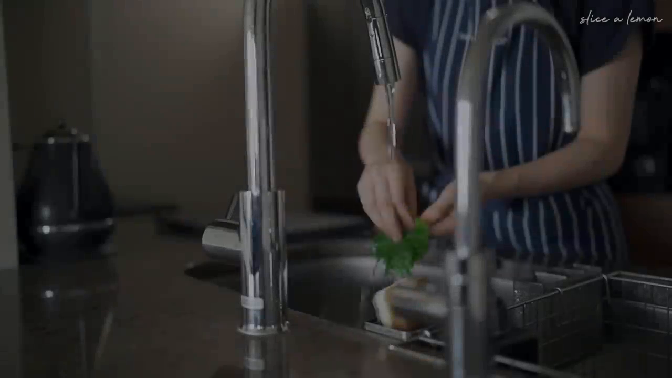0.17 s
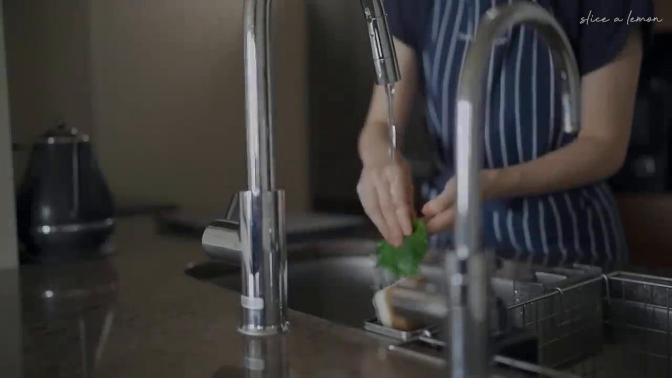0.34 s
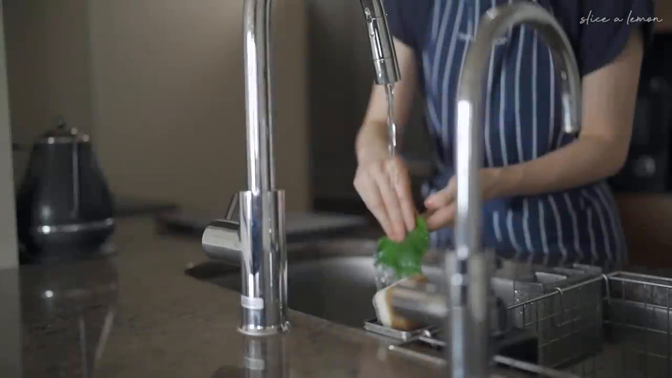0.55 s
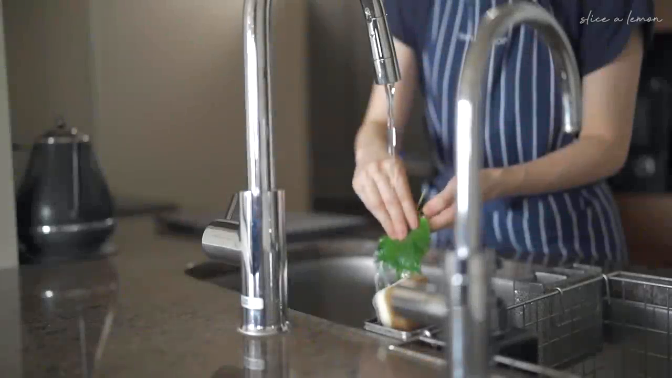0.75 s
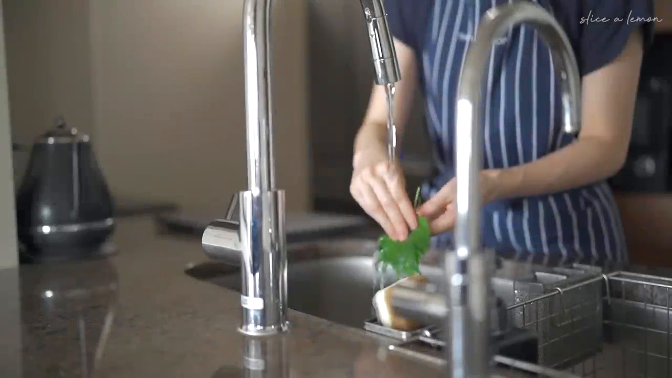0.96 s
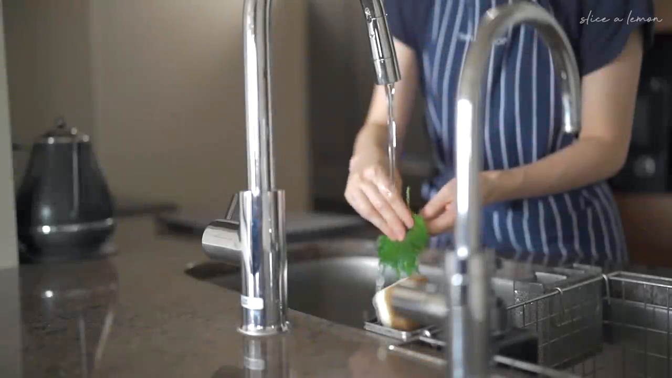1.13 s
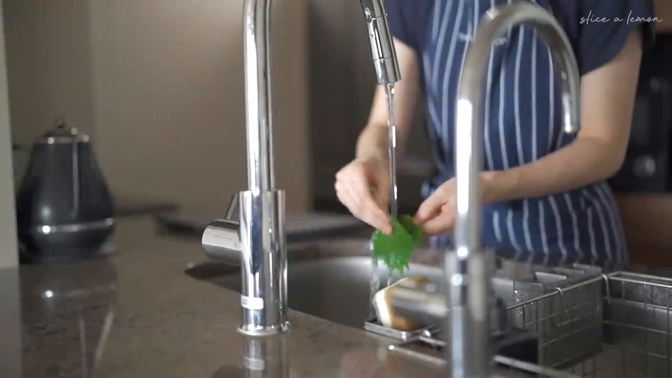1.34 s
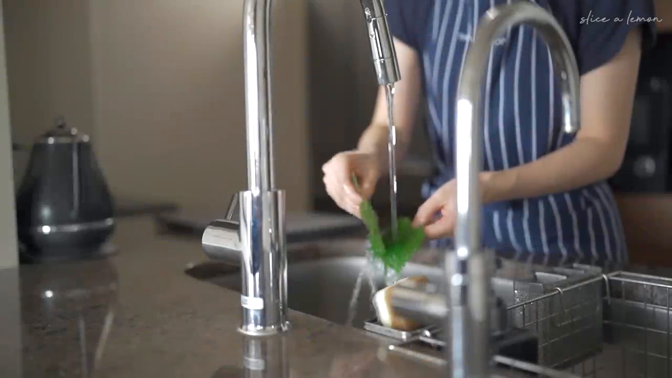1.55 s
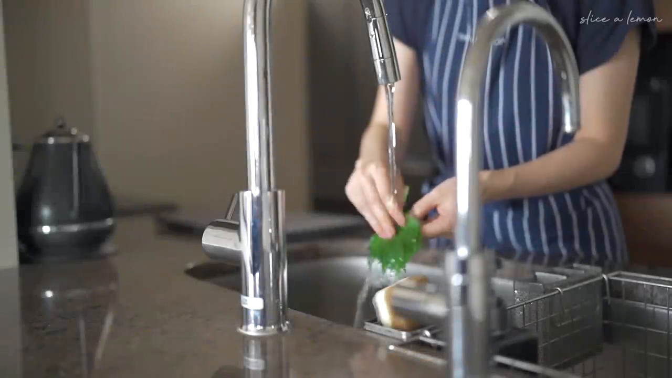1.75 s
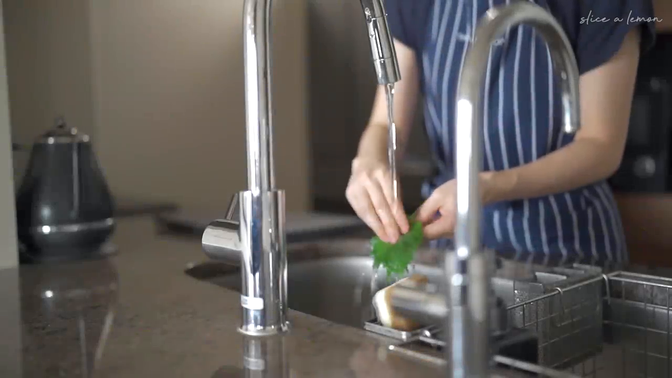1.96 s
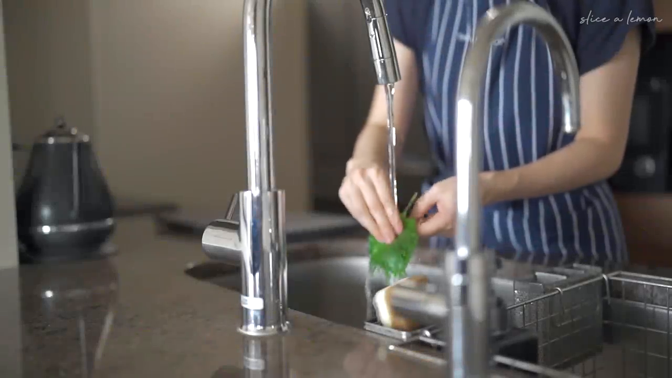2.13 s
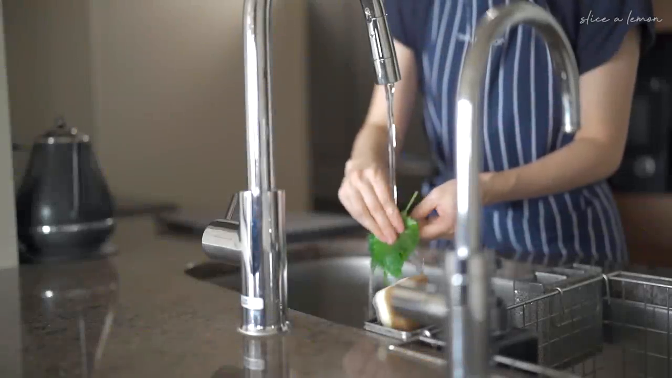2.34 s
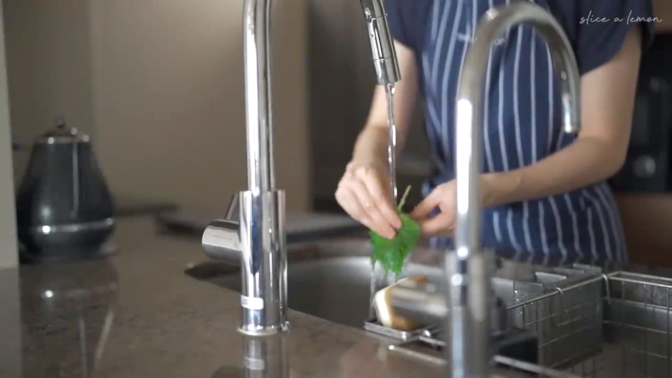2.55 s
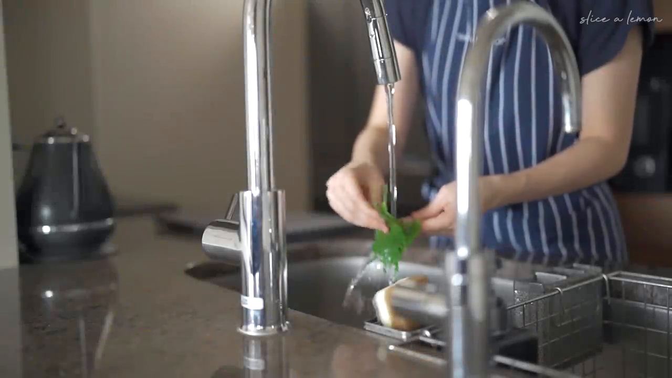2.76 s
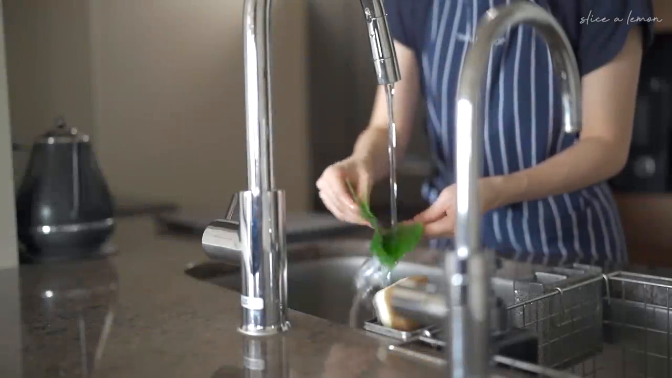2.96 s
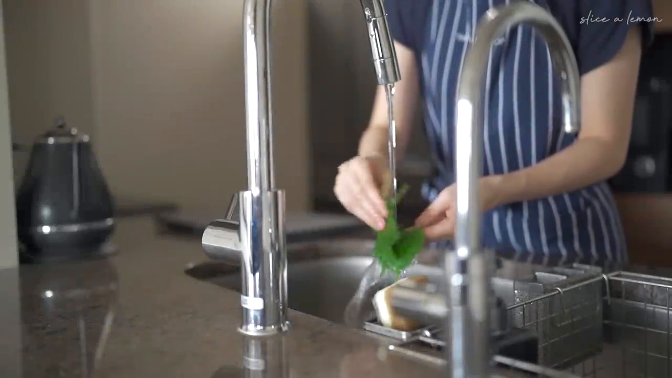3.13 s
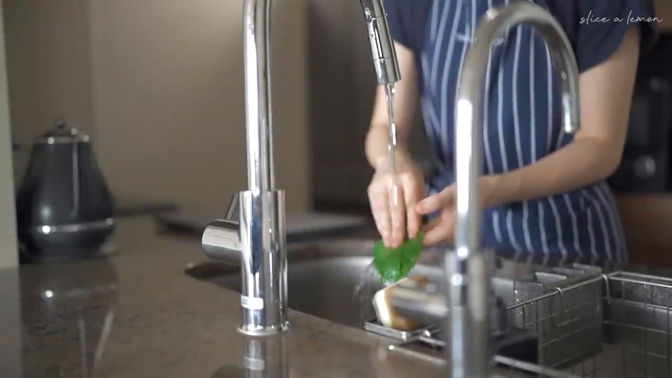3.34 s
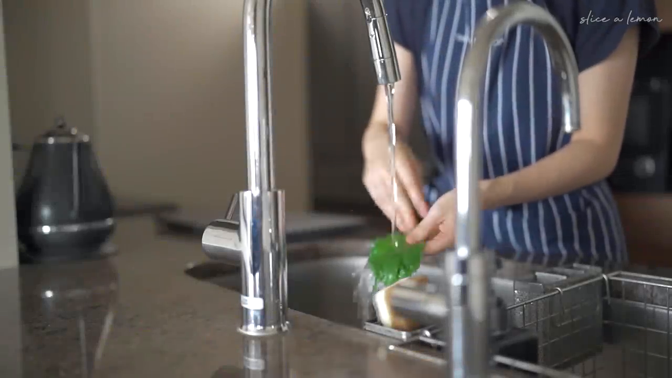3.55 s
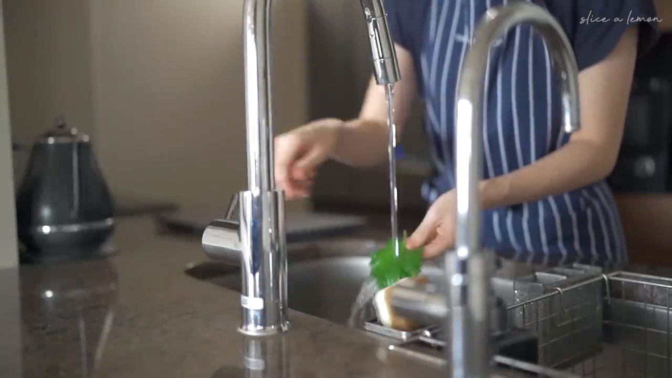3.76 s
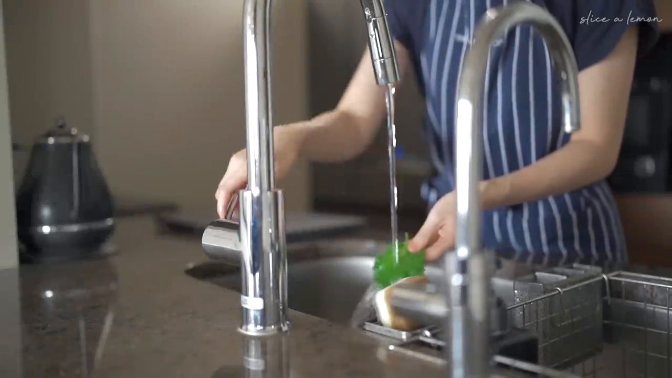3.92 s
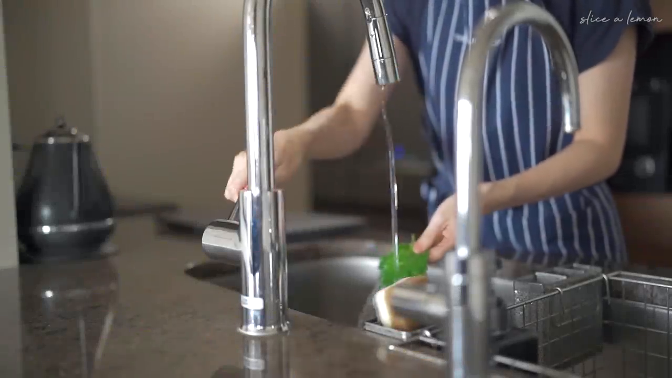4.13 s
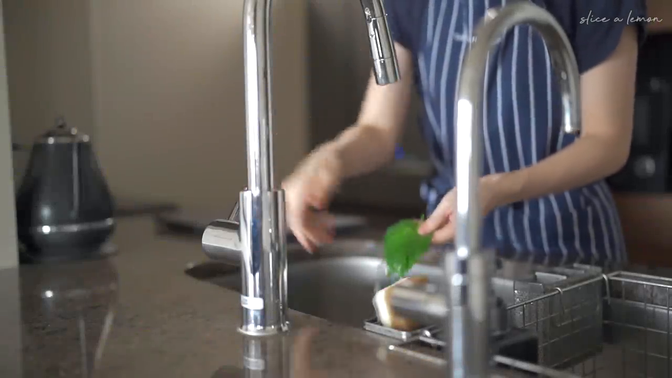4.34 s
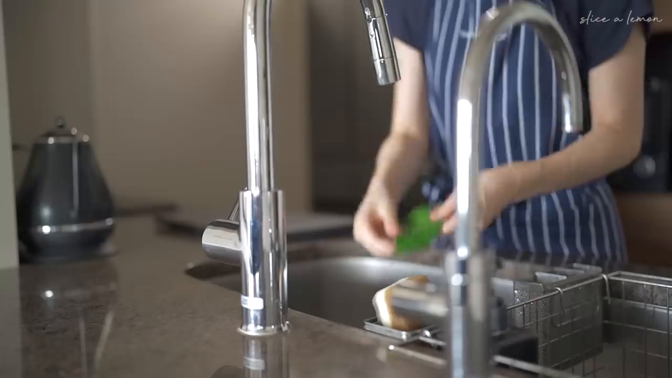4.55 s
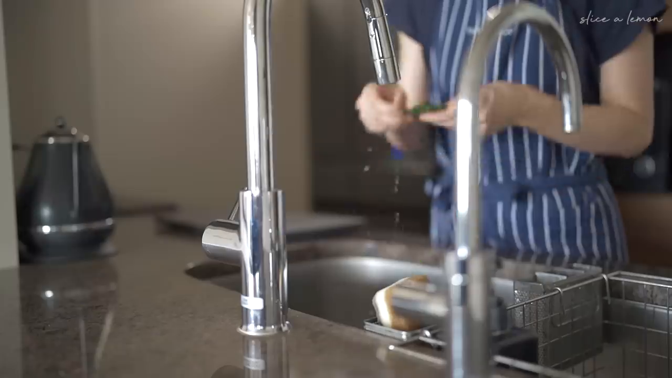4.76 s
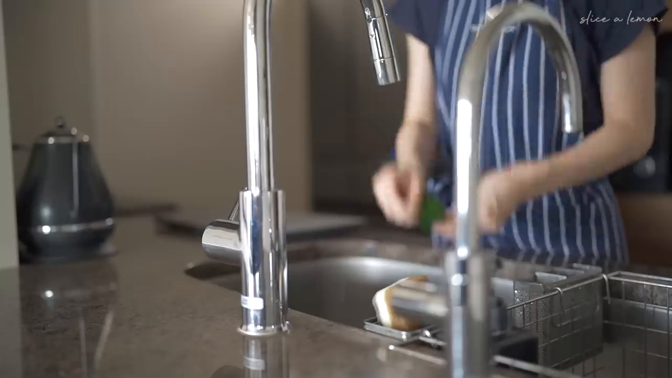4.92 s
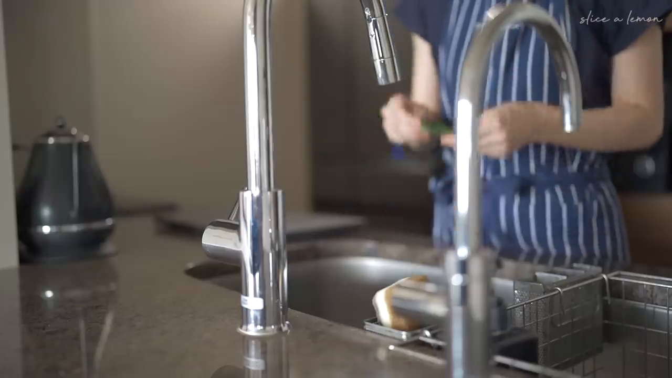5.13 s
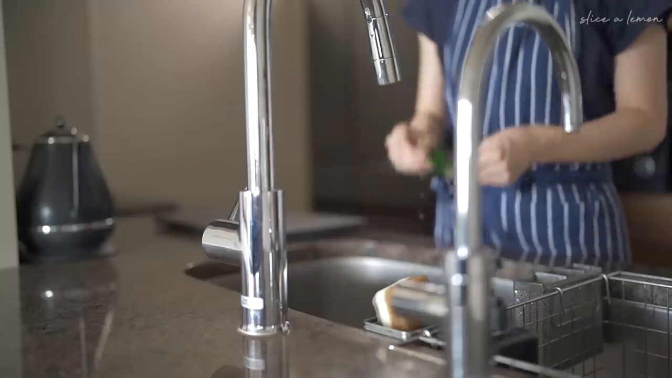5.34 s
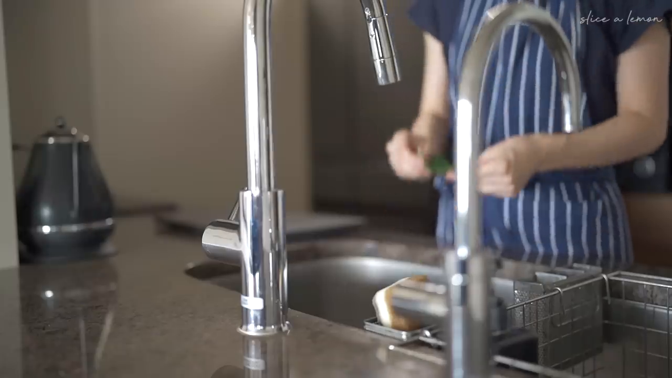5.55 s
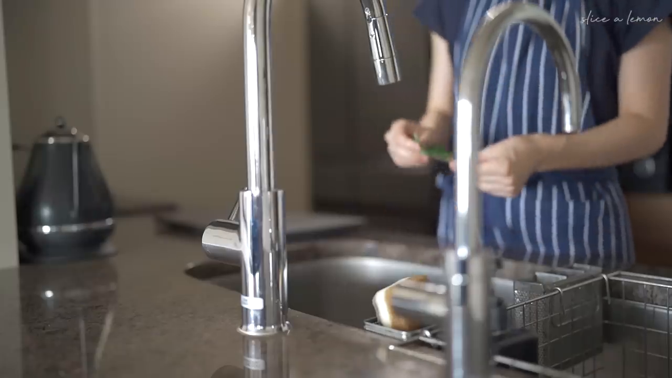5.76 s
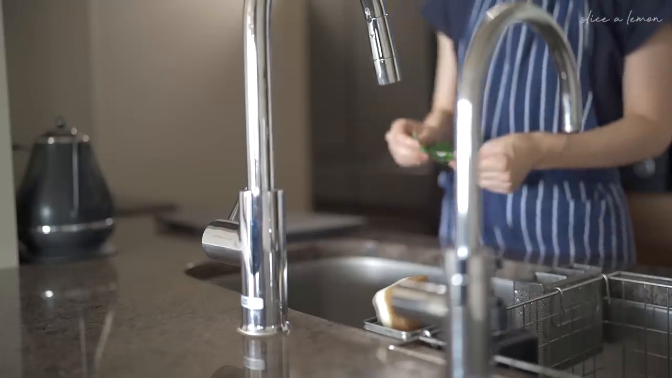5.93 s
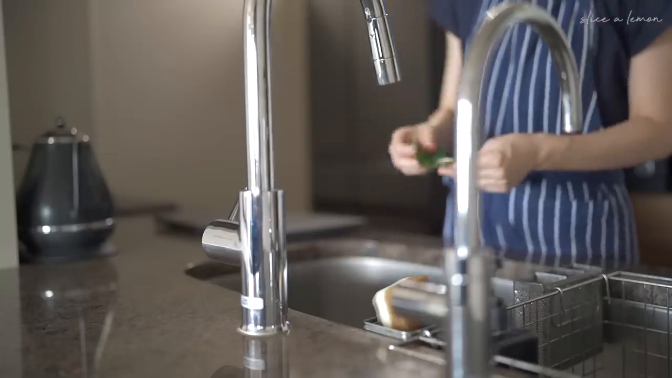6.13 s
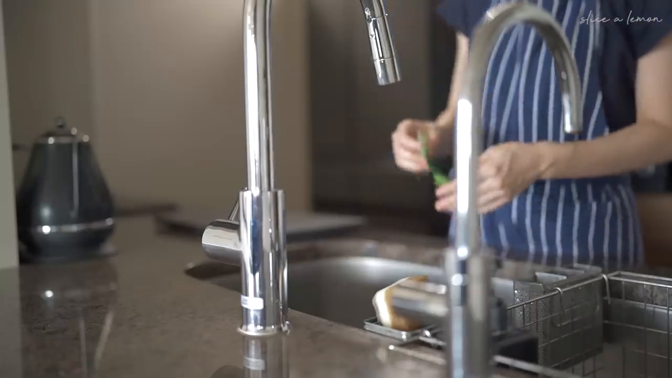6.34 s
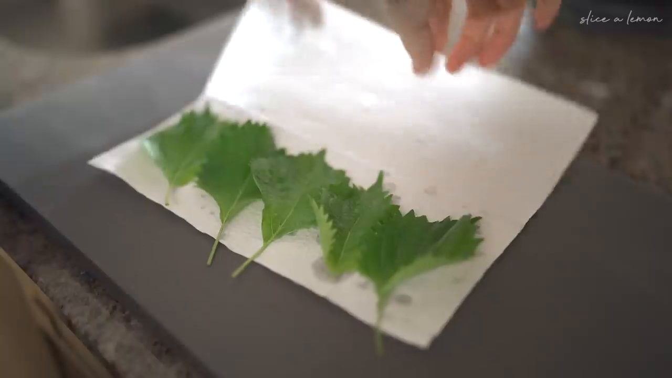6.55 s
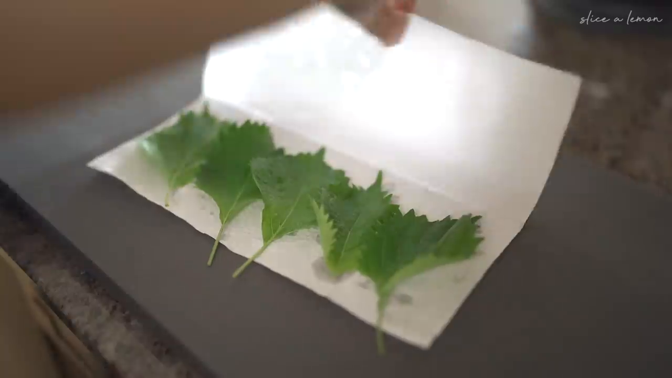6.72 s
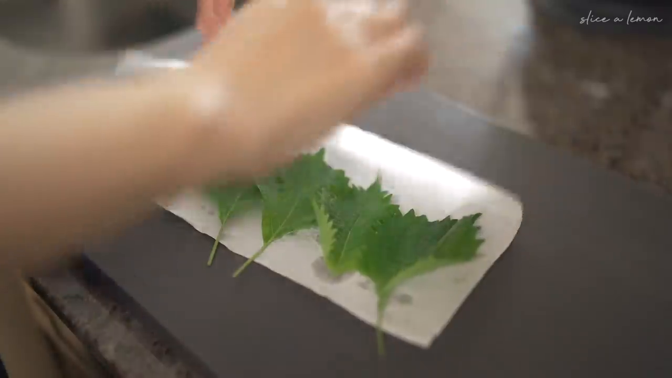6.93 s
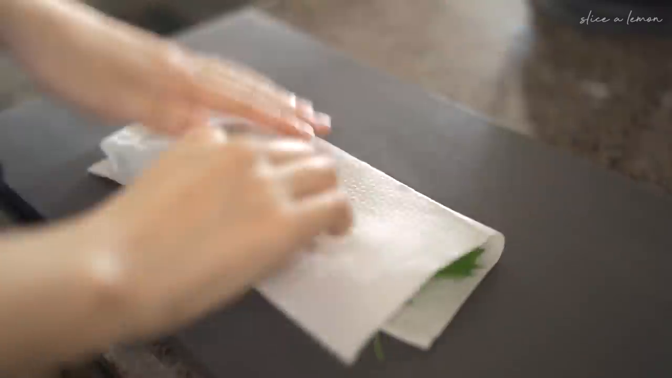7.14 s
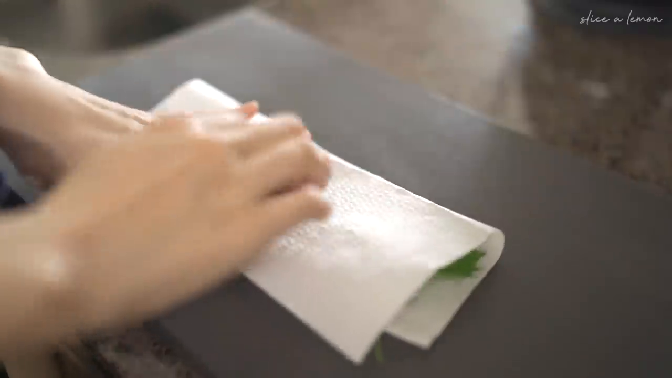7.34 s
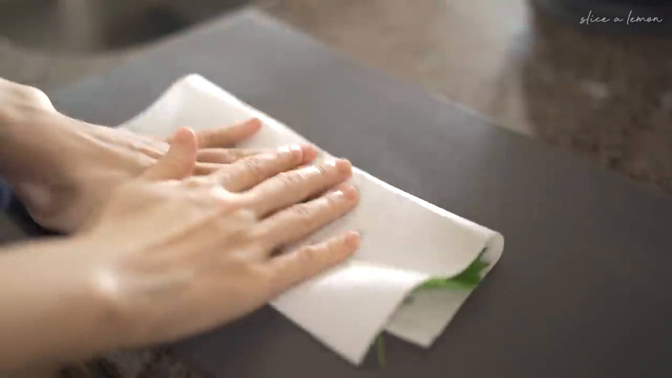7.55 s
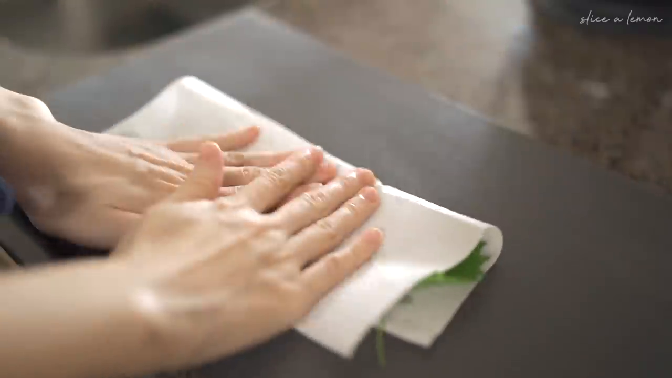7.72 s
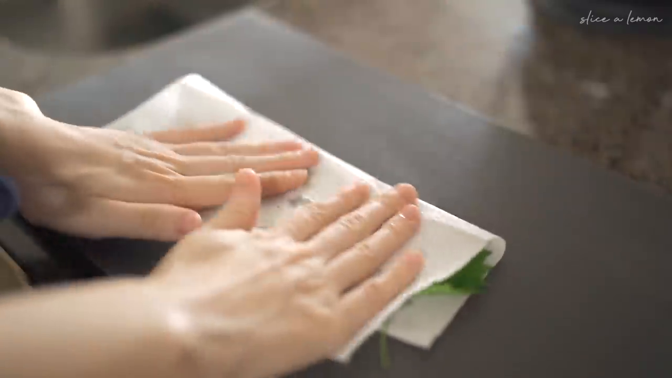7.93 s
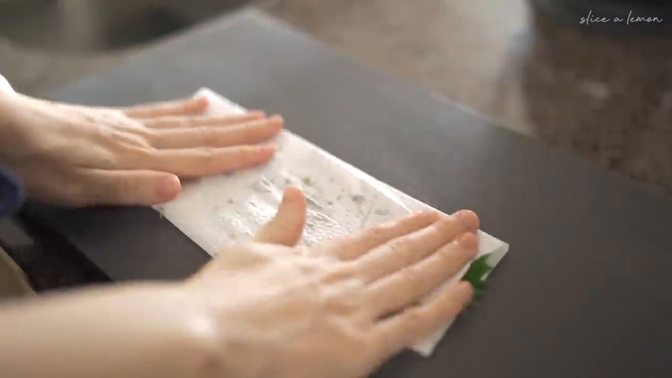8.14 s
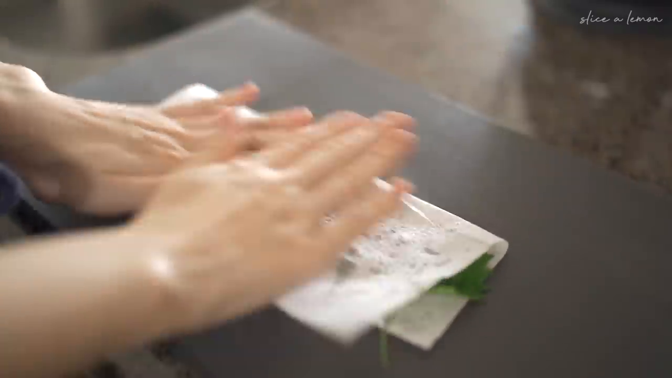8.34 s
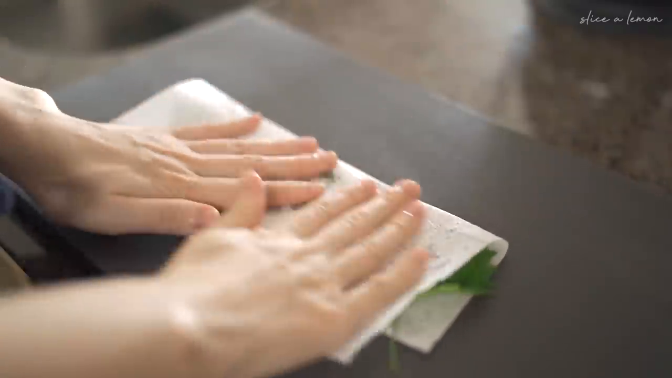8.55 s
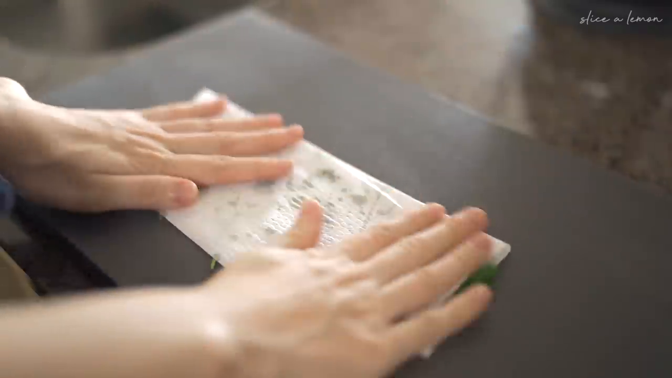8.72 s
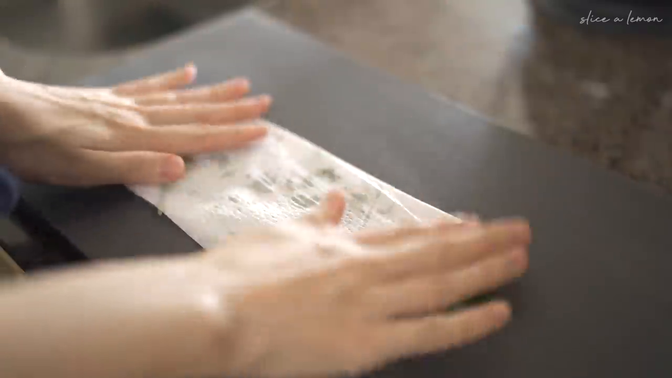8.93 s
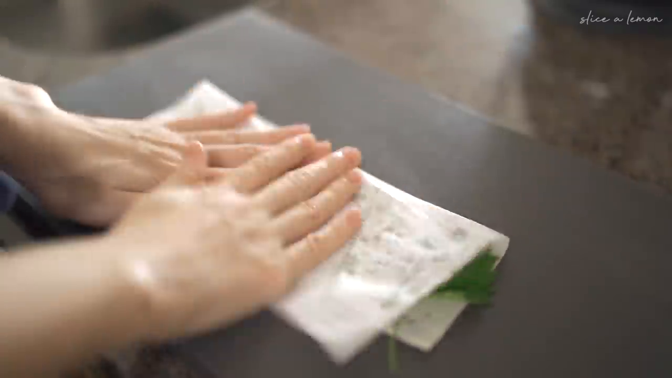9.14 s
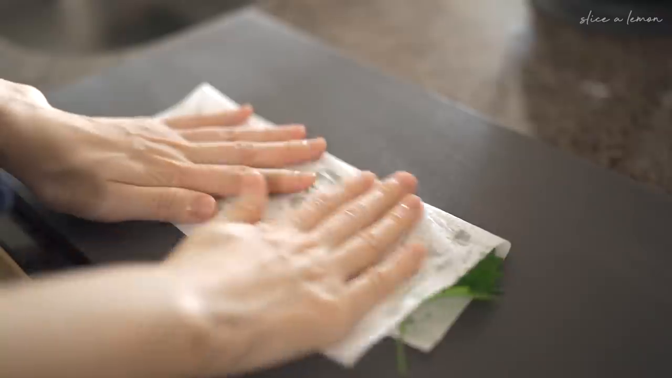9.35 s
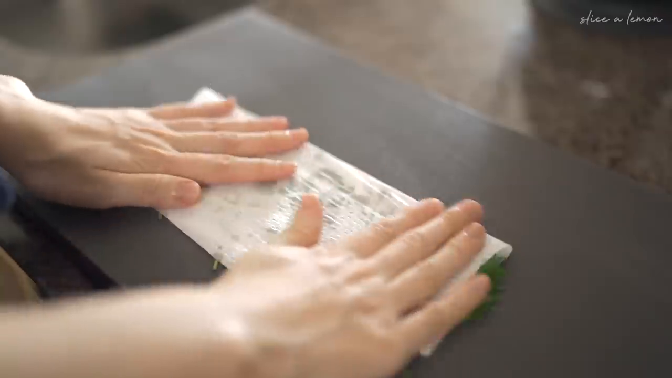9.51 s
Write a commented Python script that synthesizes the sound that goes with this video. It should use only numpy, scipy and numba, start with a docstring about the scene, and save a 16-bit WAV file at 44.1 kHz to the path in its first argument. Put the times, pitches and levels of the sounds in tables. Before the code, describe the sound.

A close microphone in a quiet, hard-walled kitchen picks up a thin tap stream breaking over leaves in a steel sink. From 0 to about 4.4 s, separate fat drops splat irregularly, each a bright wet tick with tiny rising bubble chirps, over light patter, fizzy spray and a faint metallic drumming. The opening is splashy, with denser bursts near 1.6-1.9 and 3.2 s; occasional blunt thumps hit the basin. The tap shuts around 4.4 s and the flow dies quickly. Sparse, small drips plink until about 6 s, one clearer at 5.5, with very faint shaken water. From 6.6 to 7.3 s a paper towel is folded with short crackles, crease ticks and pats. Rubbing starts softly around 7.5 s, then firmer dry, raspy strokes run about 7.8-8.2, 8.5-8.9 and 9.2 s to the end, separated by brief gaps and pats. Short, bright reflections surround everything over very low air noise.

```python
"""Tap water on leaves, then a paper towel

A thin tap stream breaks over leaves held in a steel sink: noise drives the basin's resonances, and rains of
short rings make the patter and spray. Fat drops splat as spatter and rising bubbles, and slugs thump the floor.
The tap is shut and last drops fall; then a paper towel is folded over the leaves and rubbed, as bands of
clicking fibre noise with crease ticks. One microphone close by, in a quiet hard-walled kitchen."""
import sys
import numpy as np
from scipy import signal
from scipy.fft import rfft, irfft
from scipy.io import wavfile
from scipy.ndimage import uniform_filter1d
from numba import njit

SR = 44100
rng = np.random.default_rng(int(sys.argv[2]) if len(sys.argv) > 2 else 0)


def wav_record(signal):
    """Record a signal, one row per channel, as 16-bit PCM in the file named by sys.argv[1]."""
    frames = np.transpose(np.atleast_2d(signal))
    bounded = np.clip(frames, -1, 1)
    # unit amplitude maps onto the largest positive 16-bit level
    quanta = np.round(bounded * 32767).astype(np.int16)
    wavfile.write(sys.argv[1], SR, quanta)


N = 426888

# spectrum of the still air: pitch_hz [Hz], density_db [dB per Hz, relative]
AIR_SPECTRUM = [(59, -84), (100, -41), (348, -14.5), (440, -7.5), (479, -14.5), (579, -2), (657, -3.5),
                (715, -4), (1270, -2), (1780, -10), (3890, -6.5), (4600, -14.5), (15700, -12)]
AIR_DB = -66.5
# echo of basin and tiles by band: centre_hz [Hz], width_hz [Hz], t60_s [s], level_db [dB, relative]
ECHO_BANDS = [(970, 1550, 0.29, -11), (3830, 1320, 0.3, -8.5), (7000, 4000, 0.34, -9),
              (13800, 7100, 0.14, -1.5)]
BOTTOM_HZ, TOP_HZ = 306, 15720  # edges of the high-pass and of the recorder's low-pass

# spectrum of the towel's fibres: pitch_hz [Hz], density_db [dB per Hz, relative]
PAPER_SPECTRUM = [(240, -69), (400, -37), (728, -22), (798, -32), (960, -19.5), (2600, -1.5), (3430, 5),
                  (4890, -1.5), (13900, -12.5), (15700, -6)]
# palm strokes along the towel, one curve for each stroke: time_s [s], rub_db [dB]
STROKES = [
    [(7.33, -58), (7.43, -63.5), (7.49, -60), (7.52, -49.5), (7.57, -49.5), (7.7, -49), (7.79, -49)],
    [(7.79, -54.5), (7.85, -46), (7.92, -43), (7.98, -46.5), (8.06, -43), (8.14, -44), (8.26, -58),
     (8.335, -56.5), (8.36, -69), (8.425, -79)],
    [(8.45, -74), (8.51, -49.5), (8.58, -44), (8.76, -45), (8.82, -51), (8.95, -52.5), (8.975, -61),
     (9.0, -71), (9.14, -83)],
    [(9.17, -60), (9.25, -52.5), (9.33, -44), (9.45, -45), (9.55, -48.5), (9.68, -47.5)],
]
# fibre hiss over the rub, one value for each stroke: hiss_db [dB]
STROKE_HISS = [-1, 4.5, 6, 5]
# folds, presses and pats: start_s [s], length_s [s], rub_db [dB], flex_db [dB], hiss_db [dB]
RUSTLES = [(6.584, 0.016, -71, -64.5, -66), (6.637, .008, -54, -51, -56),
           (6.674, 0.0074, -49.5, -49, -51.5), (6.744, 0.019, -71, -52, -64),
           (6.885, 0.016, -65, -61.5, -63), (7.084, 0.0072, -48, -55.5, -51),
           (7.122, 0.026, -44, -49, -48.5), (7.17, 0.064, -52, -54, -51),
           (7.256, 0.0075, -47, -47.5, -45.5), (7.292, 0.018, -52, -70, -55), (8.269, .015, -57, -59, -48),
           (8.443, 0.0054, -47, -50, -48), (8.474, 0.0059, -46, -52, -48), (9.151, .012, -48, -52.5, -54),
           (9.171, 0.0038, -49, -45, -45)]
RUSTLE_RISE_DB_PER_S, RUSTLE_FALL_DB_PER_S = 1300, 500
# creases snapping: start_s [s], level_db [dB]
CREASES = [(6.563, -41.5), (6.637, -34.5), (7.078, -37), (7.106, -34), (7.121, -45), (7.136, -39),
           (7.149, -43), (7.258, -44), (7.315, -34.5), (7.366, -36), (7.514, -37), (7.54, -31.5),
           (8.277, -40), (8.438, -36), (8.984, -45), (9.148, -35)]
# the sheet flexes at FLEX_DB under a firm stroke and follows the rub only by this share
FLEX_DB, FLEX_FOLLOWS, FIRM_RUB_DB = -54.5, 0.57, -45

# resonances of the steel basin: pitch_hz [Hz], width_hz [Hz], level_db [dB, relative]
BASIN_MODES = [(248, 33, -4.5), (374, 31, -4), (574, 32, -2), (632, 54, 0), (747, 63, -5),
               (1050, 560, -9.5), (1670, 64, -4.5)]
# running water, before its uneven surge: time_s [s], patter_db [dB], spray_db [dB]
STREAM_LEVELS = [(0.0, -49, -54.5), (0.09, -54, -38), (0.22, -52.5, -55.5), (0.38, -57, -58),
                 (0.55, -65, -55.5), (0.71, -60.5, -51), (1.02, -64.5, -55), (1.62, -64, -56),
                 (1.79, -54, -47), (2.04, -74, -55), (2.22, -63, -49), (2.59, -55.5, -51.5),
                 (2.89, -62, -56), (3.03, -55.5, -52), (3.14, -57.5, -49), (3.21, -49.5, -43.5),
                 (3.4, -60.5, -53), (3.58, -59.5, -55.5), (3.78, -57.5, -47.5), (4.35, -58.5, -52),
                 (4.54, -65, -63), (4.7, -75, -73), (6.55, -82.5, -81)]
# spectrum of the fine spray: pitch_hz [Hz], density_db [dB per Hz, relative]
SPRAY_SPECTRUM = [(2940, -55), (5000, -26), (7690, -0.5), (10300, 4), (11800, 7), (15100, 12.5),
                  (15700, -7)]
# water shaken off the leaves, drumming faintly: start_s [s], length_s [s], level_db [dB]
SHAKES = [(4.72, 0.27, -78.5), (5.17, 0.062, -70), (5.49, 0.22, -70.5)]
SHAKE_EDGE_DB_PER_S = 98
# the basin drums at DRUM_DB and follows the spray by this share; once the tap is shut it dies away
DRUM_DB, DRUM_FOLLOWS, USUAL_SPRAY_DB = -59.5, 0.23, -55.5
SHUT_S, DRAIN_DB_PER_S = 4.4, 61

# slugs of water thumping the basin floor: start_s [s], level_db [dB], pitch_hz [Hz]
THUMPS = [(0.015, -44.5, 680), (0.594, -36, 1700), (1.603, -39, 1630), (1.717, -43, 720),
          (1.814, -39, 1570), (2.254, -44.5, 604), (2.386, -40, 1240), (3.869, -43, 600), (4.02, -37, 820),
          (4.104, -43.5, 610), (4.122, -32.5, 1720), (4.126, -43, 623)]
# last drips from leaf and spout: start_s [s], level_db [dB], bubble_hz [Hz]
DRIPS = [(4.6373, -44, 3840), (4.7297, -53, 3600), (4.7436, -52, 2890), (4.864, -49.5, 4300),
         (4.964, -46.5, 3700), (5.019, -49.5, 3600), (5.2687, -47, 3480), (5.4436, -60, 3180),
         (5.5238, -37, 2940), (5.6501, -51, 15000), (5.7352, -51, 3170), (5.7944, -57, 5900),
         (5.896, -58, 2900), (5.9537, -50.5, 3820), (6.0324, -46, 3150)]
# fat drops: start_s [s], bubble_hz [Hz], bubble_db [dB], spatter_hz [Hz], spatter_db [dB]
FAT_DROPS = [(.014, 3880, -35.5, 9100, -37), (.066, 3880, -21, 7940, -26), (.2084, 3780, -35, 11600, -49),
             (.2467, 4130, -34.5, 11200, -26.5), (.31, 4200, -28.5, 9050, -29.5),
             (.459, 6170, -33.5, 11400, -34.5), (.5113, 4310, -41, 12800, -20.5),
             (.5432, 5900, -43.5, 7100, -28.5), (.579, 5770, -30, 12000, -36),
             (.593, 2530, -29, 13100, -21.5), (.6364, 3740, -30, 12500, -37),
             (.75, 4100, -60, 12600, -27.5), (.764, 4100, -55, 9100, -37), (.805, 3700, -48, 9200, -34.5),
             (.832, 5830, -47.5, 12800, -24), (.858, 5280, -36.5, 8650, -28),
             (.9298, 3730, -47, 13300, -27.5), (1.058, 3450, -64, 14400, -33),
             (1.174, 5950, -53, 7300, -35), (1.3062, 5600, -32, 7260, -29.5),
             (1.355, 3520, -60, 8700, -36.5), (1.493, 6000, -62, 8050, -32.5),
             (1.5344, 3900, -60, 10100, -37), (1.5699, 3360, -55, 12400, -35),
             (1.6035, 3500, -26, 9500, -22), (1.6575, 3860, -25, 12200, -24.5),
             (1.686, 3600, -35, 7000, -35), (1.7719, 3940, -30.5, 6640, -38),
             (1.8031, 4380, -27, 7800, -28), (1.816, 4200, -31, 8000, -30),
             (1.889, 5060, -47.5, 13800, -19.5), (1.8966, 3630, -25, 14500, -40),
             (1.9415, 3660, -53.5, 7730, -30), (2.0171, 3650, -40.5, 7850, -41),
             (2.0592, 3430, -41.5, 6640, -40), (2.0957, 4200, -42, 13400, -42),
             (2.1204, 4250, -23.5, 7920, -44), (2.224, 4100, -52, 9300, -34),
             (2.2371, 3130, -43, 6330, -32), (2.251, 3200, -35.5, 6500, -40), (2.322, 5560, -41, 7600, -42),
             (2.3843, 3800, -69, 8550, -32.5), (2.4351, 3430, -28, 6960, -37),
             (2.541, 3910, -38, 11300, -30.5), (2.625, 3940, -37.5, 9000, -52),
             (2.6677, 4400, -29, 8850, -33), (2.7526, 3590, -38.5, 9360, -37),
             (2.7942, 3660, -38, 8400, -31.5), (3.0999, 3840, -61, 11100, -32.5),
             (3.1563, 5660, -30, 7500, -34), (3.1748, 3870, -30.5, 6700, -28.5),
             (3.1963, 4360, -26, 7840, -31), (3.3582, 5760, -40, 10300, -35), (3.392, 3660, -36, 9000, -44),
             (3.4555, 4340, -28.5, 7040, -39), (3.572, 3550, -43, 13600, -40),
             (3.5972, 3820, -32, 9300, -23.5), (3.6484, 4600, -31, 9300, -31.5),
             (3.706, 3730, -39, 9700, -31), (3.7245, 6100, -31.5, 12500, -26.5),
             (3.8157, 5840, -60, 7530, -27.5), (3.856, 5900, -50, 6800, -30.5),
             (3.91, 5900, -35, 13800, -29), (3.9337, 5950, -29, 8330, -24.5),
             (3.9698, 3900, -41.5, 8900, -26.5), (4.1205, 2420, -58, 13400, -29),
             (4.1522, 3350, -41.5, 10050, -22), (4.204, 4120, -63, 12400, -26),
             (4.236, 3400, -42, 9000, -48), (4.285, 2800, -62, 8000, -37), (4.3204, 3250, -58, 9000, -35.5),
             (4.3567, 3660, -47, 8600, -39), (4.373, 3980, -37.5, 9800, -20.5),
             (4.489, 6000, -29.5, 6730, -29.5), (4.5419, 4000, -33.5, 6540, -50)]
SMALL_DROPS = 10  # lesser drops at chance moments while the tap runs
SMALL_BUBBLE_DB, SMALL_SPATTER_DB, SMALL_SPREAD_DB = -48.5, -43.5, 7  # lowest levels, and the range above them
BUBBLE_START, DRIP_START = 0.881, 0.93  # share of its listed pitch around which a bubble starts its chirp


def undb(db):
    """Logarithmic level: the amplitude gain is 10 to the power dB / 20."""
    return 10 ** (np.asarray(db) / 20)


def unit(x):
    """Normalisation: the signal is scaled to rms 1."""
    return x / np.sqrt(np.mean(x ** 2))


def band(x, lo_hz, hi_hz):
    """Band-pass filtering: only the range between two frequencies is passed."""
    edges_hz = [lo_hz, min(hi_hz, .45 * SR)]
    return signal.sosfilt(signal.butter(2, edges_hz, "bandpass", fs=SR, output="sos"), x)


def colour(x, points):
    """Spectral shaping: the spectrum is weighted by a curve in dB over log frequency; rms 1."""
    hz, db = np.transpose(points)
    bins_hz = np.arange(len(x) // 2 + 1) * SR / len(x) + 1
    weights = undb(np.interp(np.log(bins_hz), np.log(hz), db))
    return unit(irfft(rfft(x) * weights, len(x)))


def curves(tables):
    """Piecewise-linear control: columns joined in time, with a softened gate that closes outside the spans."""
    s, *columns = np.transpose(np.concatenate(tables))
    t = np.arange(N) / SR
    on = (t >= s[0]) * (t < s[-1])
    for before, after in zip(tables, tables[1:]):
        on = on * ((t < before[-1][0]) | (t >= after[0][0]))
    return [np.interp(t, s, column) for column in columns], uniform_filter1d(1. * on, size=200)


def bursts(start_s, length_s, rise_db_per_s, fall_db_per_s):
    """Exponential envelopes: each event rises, holds and falls at constant dB per second."""
    t = np.arange(N) / SR - np.asarray(start_s)[:, None]
    before_s = np.maximum(-t, 0)
    after_s = np.maximum(t - np.asarray(length_s)[:, None], 0)
    down_db = rise_db_per_s * before_s + fall_db_per_s * after_s
    return np.exp(-np.minimum(down_db, 200).astype(np.float32) * np.log(10) / 20)


def walk(rate):
    """Random modulation: levels drawn for 1 / rate s each, then smoothed twice."""
    k = int(SR / rate)
    steps = np.repeat(rng.standard_normal(N // k + 1), k)
    return uniform_filter1d(uniform_filter1d(steps, k), k)[:N]


@njit
def ring(s, hz, cycles, glide, size, count, sr):
    """Damped oscillation: sines swell within a cycle, fall by 1 / e in `cycles`, and climb by glide per cycle."""
    y = np.zeros(count)
    for k in range(len(s)):
        i = int(s[k] * sr)
        a = size[k]
        phase = 0.
        f = hz[k] / sr  # cycles per sample
        fall, rise = np.exp(-f / cycles[k]), 1 + glide * f
        while i < count and a > .003 * size[k]:
            y[i] += a * min(phase, 1.) * np.sin(2 * np.pi * phase)
            phase, f, a, i = phase + f, min(f * rise, .4), a * fall, i + 1
    return y


def grains(s, hz, cycles, glide, db):
    """Superposition: damped rings are summed, plain numbers serving all of them."""
    one = np.ones(len(s))
    return ring(s * one, hz * one, cycles * one, float(glide), undb(db) * one, N, float(SR))


def scatter(per_s, lo_hz, hi_hz, cycles, glide, spread_db):
    """Random impacts: grains rain at chance moments, a few much larger than the rest; rms 1."""
    when, pitch, luck = rng.random((int(per_s * N / SR), 3)).T
    big = np.minimum(-np.log(1 - luck), 6)  # exponential chance
    hz = lo_hz * (hi_hz / lo_hz) ** pitch
    return unit(grains(when * N / SR, hz, cycles, glide, spread_db * big))


def cluster(s, hz, db, count, length_s, spread, cycles, glide, trail_db):
    """Fragmentation: each event breaks into several grains that trail off after it."""
    late, off = rng.random((len(s), count, 2)).transpose(2, 0, 1)
    late[:, 0], off[:, 0] = 0, .5  # the first grain is on time and on pitch
    pitch_hz = np.minimum(hz[:, None] * np.exp(spread * (2 * off - 1)), .36 * SR)
    start_s = s[:, None] + length_s * late ** 2
    level_db = db[:, None] - trail_db * late
    return grains(start_s.ravel(), pitch_hz.ravel(), cycles, glide, level_db.ravel())


def still_air():
    """Stationary noise: a steady coloured noise floor whose level wanders slightly."""
    return undb(AIR_DB + 0.18 * walk(3)) * colour(rng.standard_normal(N), AIR_SPECTRUM)


def echo(x, wet_db, count):
    """Diffuse reverberation: each band dies at its own rate; the sound jumps between spots that echo differently."""
    t = np.arange(SR // 2) / SR
    spot = np.repeat(rng.integers(count, size=N // 2000 + 1), 2000)[:N]
    out = x
    for k in range(count):
        tail = np.zeros(len(t))
        for hz, width, t60, db in ECHO_BANDS:
            noise = unit(band(rng.standard_normal(len(t)), hz - width / 2, hz + width / 2))
            tail = tail + undb(db - 60 * t / t60) * noise
        tail = tail * np.clip(t / 0.00043, 0, 1) / np.sqrt(SR)
        out = out + undb(wet_db) * signal.fftconvolve(x * (spot == k), tail)[:N]
    return out


def creases():
    """Buckling: paper gives way suddenly, each snap a broad band-passed tick."""
    s, db = np.transpose(CREASES)
    snaps = np.zeros(N)
    snaps[(s * SR).astype(int)] = undb(db)
    tick = band(np.arange(2000) == 0, 700, 6000)
    return signal.fftconvolve(snaps, tick / tick.max())[:N]


def towel():
    """Friction: skin drags over embossed paper as dense fibre clicks; the sheet flexes below, creases snap."""
    (rub_db,), on = curves(STROKES)
    hiss_rows = [[(s, db) for s, _ in rows] for rows, db in zip(STROKES, STROKE_HISS)]
    hiss_db = rub_db + curves(hiss_rows)[0][0]
    flex_db = FLEX_DB + FLEX_FOLLOWS * (rub_db - FIRM_RUB_DB)
    flex_db = np.minimum(flex_db, rub_db + 6.0)
    s, length, *levels_db = np.transpose(RUSTLES)
    rustles = undb(levels_db) @ bursts(s, length, RUSTLE_RISE_DB_PER_S, RUSTLE_FALL_DB_PER_S)
    gains = np.hypot(rustles, on * undb([rub_db, flex_db, hiss_db]))
    drag_db = 1.2 * walk(60)  # the hand catches and slips
    clicks_db = 2.76 * np.minimum(rng.standard_exponential(N), 7)
    fibres = colour(rng.standard_normal(N) * undb(clicks_db), PAPER_SPECTRUM)
    rub = unit(band(fibres, 1470, 4340))
    flex = unit(band(fibres, 690, 2060))
    hiss = unit(band(fibres, 7900, 22000))
    paper = undb(drag_db) * (gains * [rub, flex, hiss]).sum(axis=0)
    # the counter under the sheet answers the pats
    counter = unit(band(rng.standard_normal(N), 620, 1500))
    return paper + undb(-13.5) * rustles[1] * counter + creases()


def basin(x):
    """Modal resonance: the steel bowl's low modes ring over a broad drum tone; rms 1."""
    out = undb(-2.0) * band(x, 468, 2050)
    for hz, width, db in BASIN_MODES:
        out = out + undb(db) * signal.lfilter(*signal.iirpeak(hz, hz / width, SR), x)
    return unit(out)


def stream():
    """Jet break-up: the broken stream drums the steel, patters as small bubbles and hisses as spray."""
    (patter_db, spray_db), on = curves([STREAM_LEVELS])
    shut_db = -DRAIN_DB_PER_S * np.maximum(np.arange(N) / SR - SHUT_S, 0)
    held_db = np.maximum(spray_db, USUAL_SPRAY_DB - 2.0)
    s, length, db = np.transpose(SHAKES)
    shakes = undb(db) @ bursts(s, length, SHAKE_EDGE_DB_PER_S, SHAKE_EDGE_DB_PER_S)
    blows = undb(DRUM_DB + DRUM_FOLLOWS * (held_db - USUAL_SPRAY_DB) + shut_db) + shakes
    surge_db = 2.5 * walk(25)  # the leaves break the flow unevenly
    drum = basin(rng.standard_normal(N) * undb(2.7 * walk(60)))
    patter = scatter(700, 2000, 6480, cycles=6.6, glide=0.059, spread_db=3.2)
    spray = colour(scatter(4000, 3780, 15100, cycles=3.0, glide=0.037, spread_db=4.9), SPRAY_SPECTRUM)
    # stray droplets tick on the steel
    strays = scatter(98, 6200, 14000, cycles=3.3, glide=0, spread_db=3.1)
    spray = spray + undb(-12.0 + np.maximum(shut_db, -9.0)) * strays
    return on * (blows * drum + undb(patter_db + surge_db) * patter + undb(spray_db + surge_db) * spray)


def thumps():
    """Blunt impact: heavy slugs thump the steel as a few low, quickly damped rings."""
    s, db, hz = np.transpose(THUMPS)
    return cluster(s, hz, db, count=3, length_s=0.012, spread=0.25, cycles=2.66, glide=0, trail_db=4.0)


def drips():
    """Impact and entrainment: a drip lands with a bright tick and traps bubbles that chirp upward."""
    s, db, hz = np.transpose(DRIPS)
    ticks = grains(s, 2.4 * np.minimum(hz, 5500), 1.8, 0, db - 1.5)
    bubbles = cluster(s, DRIP_START * hz, db, count=2, length_s=0.0099, spread=0.19, cycles=6.9,
                      glide=0.023, trail_db=14.0)
    return ticks + bubbles


def small_drops():
    """Chance arrivals: rows like those of the fat drops, drawn at random."""
    when, low, high, a, b = rng.random((SMALL_DROPS, 5)).T
    bubble_db = SMALL_BUBBLE_DB + SMALL_SPREAD_DB * a
    spatter_db = SMALL_SPATTER_DB + SMALL_SPREAD_DB * b
    return np.transpose([when * SHUT_S, 3000 * 1.9 ** low, bubble_db, 6500 * 3.4 ** high, spatter_db])


def drops():
    """Bubble entrainment: a drop smacks down, throws spatter and traps bubbles that chirp upward."""
    s, bubble_hz, bubble_db, spatter_hz, spatter_db = np.concatenate([FAT_DROPS, small_drops()]).T
    smack = grains(s, spatter_hz, 2.7, 0, spatter_db + 4.5)
    spatter = cluster(s, spatter_hz, spatter_db, count=12, length_s=0.018, spread=0.49, cycles=4.23,
                      glide=0.0085, trail_db=10.0)
    bubbles = cluster(s, BUBBLE_START * bubble_hz, bubble_db, count=4, length_s=0.013, spread=0.21, cycles=8.6,
                      glide=0.0334, trail_db=15.0)
    return smack + spatter + bubbles


def scene():
    """Superposition of sources: still air, the drier towel on the counter, water in the echoing basin."""
    air = still_air()
    rubbing = echo(towel(), 4.9, count=5)
    water = echo(stream() + thumps() + drips() + drops(), 15.0, count=10)
    # the microphone cuts the bass; the still air's spectrum already includes this cut
    bass_cut = signal.butter(4, BOTTOM_HZ, "highpass", fs=SR, output="sos")
    mono = signal.sosfilt(bass_cut, rubbing + water) + air
    return np.array([mono, mono])


def record(dry):
    """Band limitation: the recorder cuts the top with a steep low-pass."""
    return signal.sosfilt(signal.ellip(14, .3, 70, TOP_HZ, fs=SR, output="sos"), dry)


dry = scene()
out = record(dry)
wav_record(out)
```